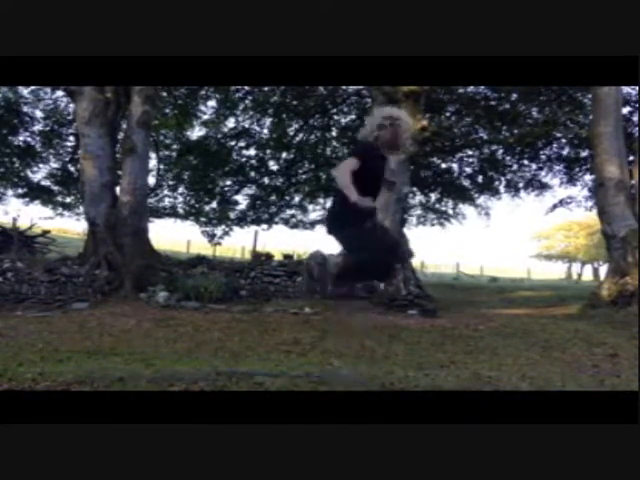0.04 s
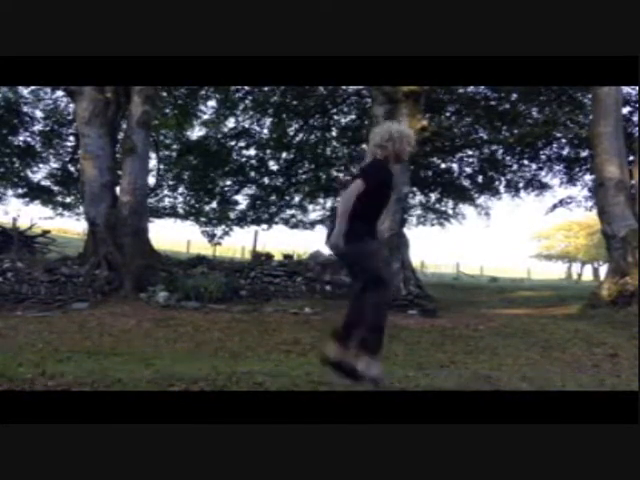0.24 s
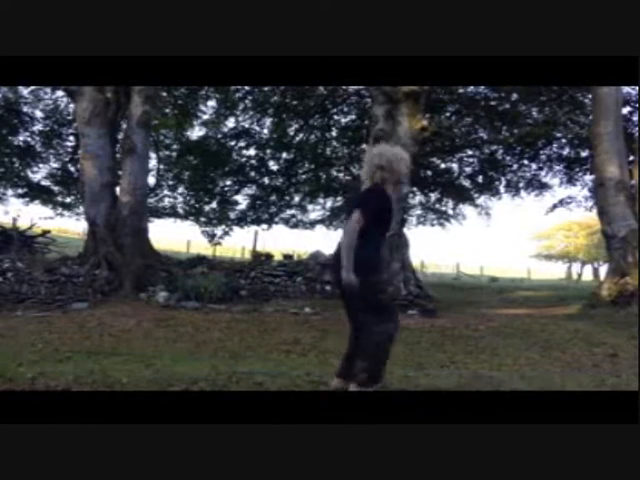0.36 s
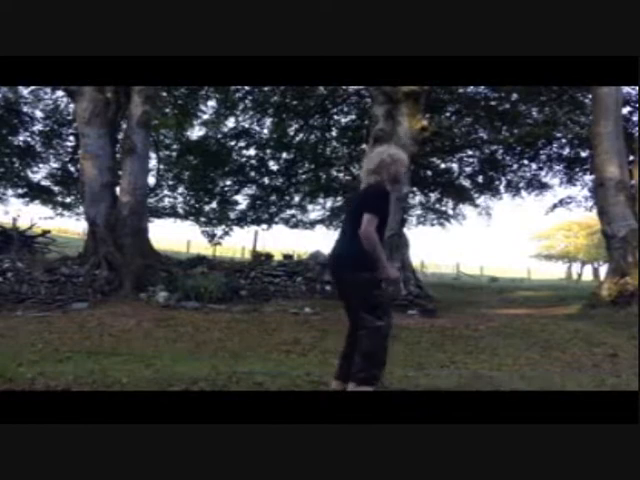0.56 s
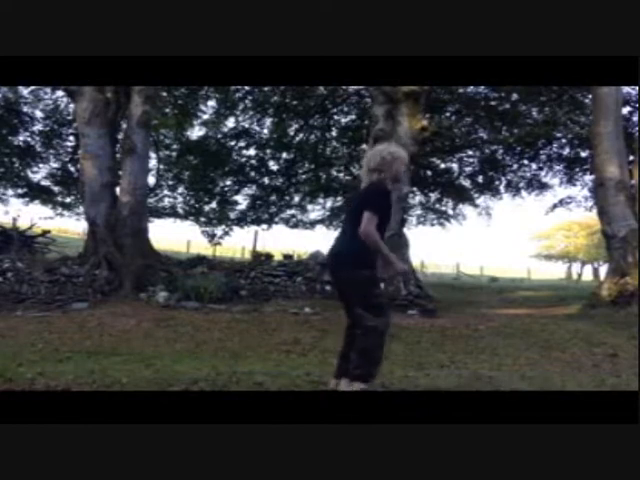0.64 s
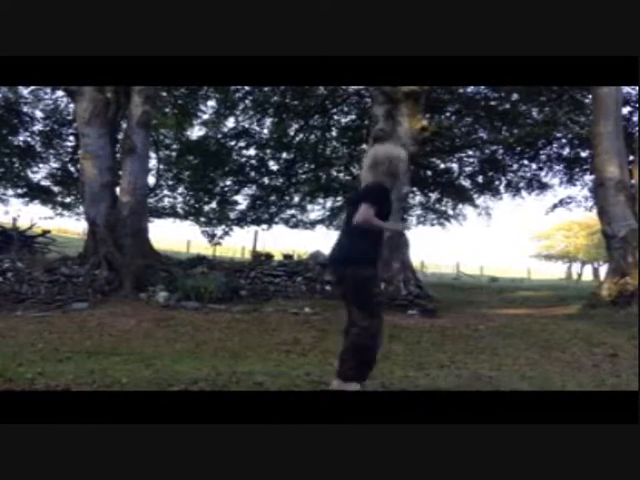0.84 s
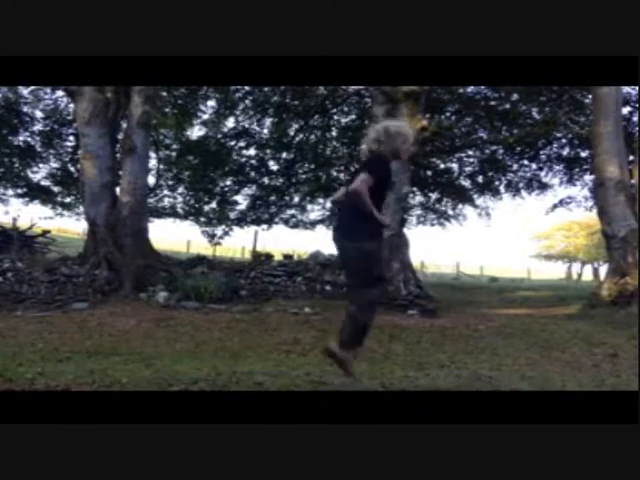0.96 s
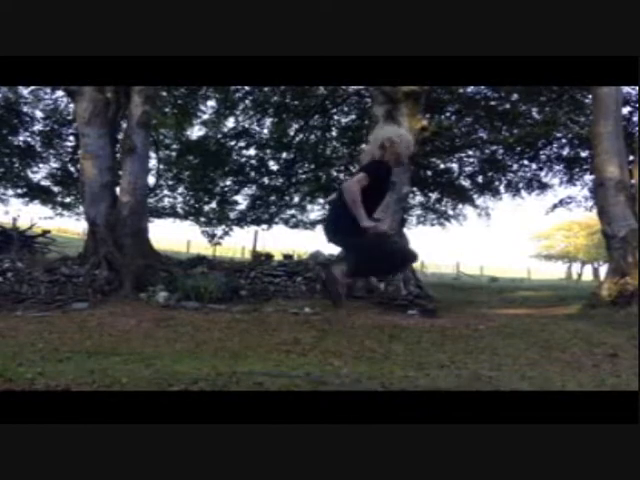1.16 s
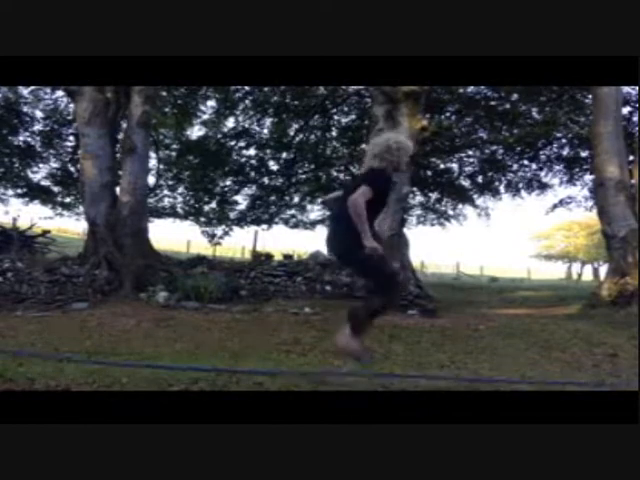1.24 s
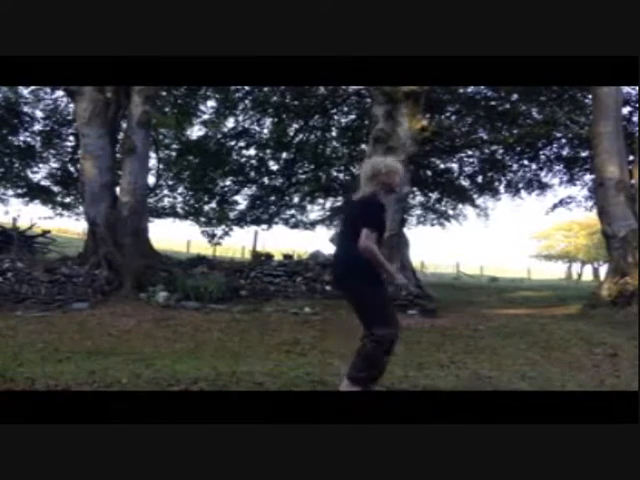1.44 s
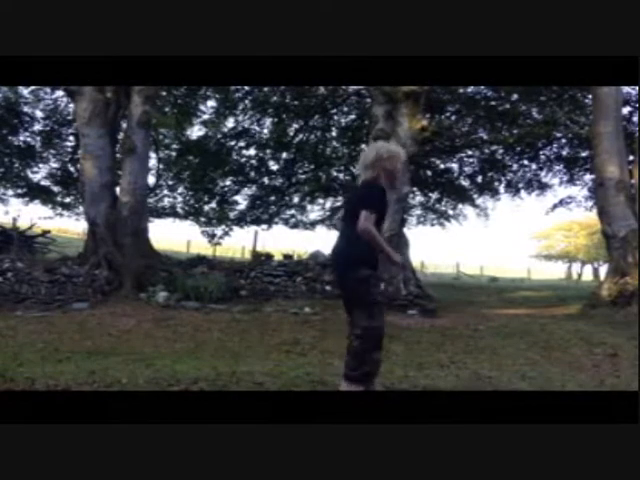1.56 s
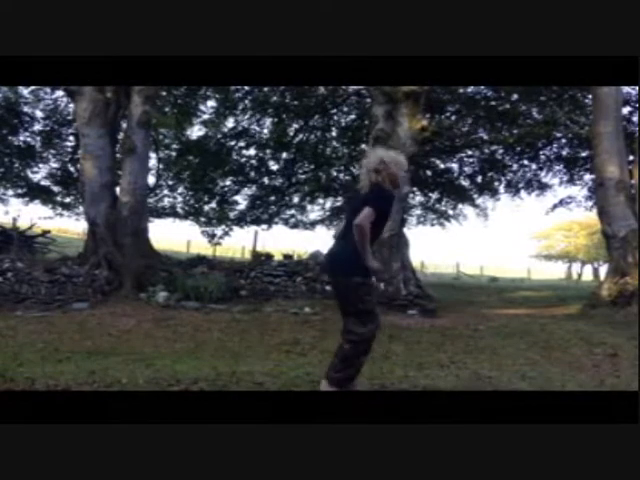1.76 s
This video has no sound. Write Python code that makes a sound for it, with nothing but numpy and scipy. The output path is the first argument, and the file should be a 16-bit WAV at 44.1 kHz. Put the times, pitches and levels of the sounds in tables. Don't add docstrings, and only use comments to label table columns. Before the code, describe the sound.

A skipping rope cracks hard on turf twice, about a second apart, each slap followed by a duller foot landing, with grass rustle and tiny ticks between; close, dry, nearly mono microphone outdoors under trees.

```python
import sys
import numpy as np
from scipy import signal
from scipy.fft import rfft, irfft, next_fast_len
from scipy.io import wavfile
from scipy.ndimage import uniform_filter1d

SR = 44100
rng = np.random.default_rng(int(sys.argv[2]) if len(sys.argv) > 2 else 0)


def gain_from_decibels(decibels):
    exponent = np.asarray(decibels, float) / 20
    return 10 ** exponent


def to_wav(s):
    ch = np.atleast_2d(s).T
    pcm = np.round(np.clip(ch, -1, 1) * 32767)
    wavfile.write(sys.argv[1], SR, pcm.astype(np.int16))


N = 79380
t = np.arange(N) / SR

# (time [s], level [dB],
# ring pitch [Hz], ring t60 [s], thump level [dB])
KNOCKS = [(.054, -24.5, 756, 0.015, -6), (0.0723, -35, 715, 0.02, -1.5), (0.2126, -9.5, 990, 0.025, -3.5),
          (0.2174, -17.5, 713, 0.074, -8.5), (0.2141, -14, 727, 0.043, -20), (0.2166, -16, 910, .015, -12),
          (.2222, -17.5, 800, 0.025, -25), (.228, -24.5, 1164, 0.041, -18), (.246, -27, 890, 0.03, -7),
          (.283, -20, 875, 0.014, -16), (1.3282, -6.5, 907, 0.018, -18.5),
          (1.3328, -18.5, 727, 0.045, -0.5), (1.3355, -18.5, 1166, .03, -16), (1.339, -18, 1026, 0.02, -14),
          (1.353, -32, 790, 0.026, -16), (1.362, -28, 780, 0.021, -20), (1.394, -25.5, 640, 0.021, -27)]
# (landing time [s], level [dB], duration [s], first pitch [Hz], last pitch [Hz])
SWINGS = [
    (0.213, -39, 0.1013, 109.7, 196.3),
    (1.327, -44.5, 0.077, 124.2, 191),
]
# (frequency [Hz], level [dB])
BLADES = [(300, -41), (1500, -13), (3000, 1), (5000, 3.5), (6500, 5), (8500, 5.5), (11000, 4.5), (12000, 0)]


def unit(x):
    return x / np.sqrt(np.mean(x ** 2))


def colour(x, points):
    p = np.array(points, float)
    n = next_fast_len(N)
    f = np.maximum(np.arange(n // 2 + 1) * SR / n, 1)
    gain = gain_from_decibels(np.interp(np.log(f), np.log(p[:, 0]), p[:, 1]))
    return irfft(rfft(x, n) * gain, n)[:N]


def band(x, hz, width):
    return signal.lfilter(*signal.iirpeak(hz, hz / width, fs=SR), x)


def walk(rate):
    hold = int(SR / rate)
    levels = np.repeat(rng.standard_normal(N // hold + 1), hold)
    return 1.225 * uniform_filter1d(uniform_filter1d(levels, hold), hold)[:N]


def decay(s, t60):
    return np.exp(-np.log(1000) * s / t60)


def ring(at, hz, t60, rise=2.85):
    s = np.maximum(t - at, 0)
    return -decay(s, t60) * np.sin(2 * np.pi * hz * s) * (1 - np.exp(-s * hz * rise))


def knocks():
    # (time [s], level [dB], ring pitch [Hz], ring t60 [s], thump level [dB])
    steps = [(0.4722, -16, 960, 0.0072, -12), (.478, -23.5, 1232, 0.021, -7),
             (0.4824, -22, 597, 0.017, -10.5), (.4935, -28, 1090, 0.018, -22),
             (0.501, -30, 526, 0.019, -1.5), (0.806, -43.5, 950, 0.026, -12), (0.8991, -31, 950, 0.02, -24),
             (.9045, -33, 760, 0.011, -28), (.9173, -21.5, 965, .035, -14.5), (.9183, -21, 955, 0.031, -38),
             (.929, -35, 1010, 0.027, -28), (.971, -41, 1053, 0.032, -18), (0.991, -43, 905, .05, -27),
             (1.0855, -35, 930, 0.027, -1.5), (1.184, -40, 1220, 0.026, -14),
             (1.289, -47, 1100, 0.012, -13), (.953, -42, 646, 0.0066, -19), (1.484, -43, 880, 0.023, -27),
             (1.4929, -18, 990, 0.022, -18), (1.4947, -15, 747, 0.014, -4), (1.5012, -18.5, 612, 0.015, -7),
             (1.4937, -19.5, 354, 0.083, -26), (1.509, -23, 970, 0.0067, -14)]
    # (frequency ratio to ring [1], level [dB], t60 ratio to ring [1])
    turf = [(1.229, -8.5, 1.02), (0.767, -8.5, 0.82), (1.71, -17, 0.38), (2.436, -16, 0.63)]
    thump_hz, thump_t60_s = 204, 0.05
    sod_hz, sod_t60_s, sod_db = 369, 0.062, -5
    impacts = [*KNOCKS, *steps]
    chance = rng.standard_normal((len(impacts), 12))
    out = 0
    for (at, db, hz, t60, thump_db), c in zip(impacts, chance):
        thump = ring(at, thump_hz * (1 + 0.039 * c[0]), thump_t60_s)
        sod = gain_from_decibels(sod_db + 1.7 * c[5]) * ring(at, sod_hz * (1 + 0.025 * c[11]), sod_t60_s)
        x = ring(at, hz, t60) + gain_from_decibels(thump_db) * (thump + sod)
        if hz > 500:
            for k, (ratio, mode_db, t60_ratio) in enumerate(turf):
                mode_hz = hz * ratio * (1 + 0.045 * c[k + 6])
                x = x + gain_from_decibels(mode_db + 2.2 * c[k + 1]) * ring(at, mode_hz, t60 * t60_ratio)
        out = out + gain_from_decibels(db) * x
    return out


def cracks():
    # (time [s], level [dB], width [ms])
    pulses = [
        (.0540, -26.5, 0.12),
        (0.2133, -7, 0.067),
        (.2170, -12, 0.27),
        (.4725, -23.5, 0.21),
        (0.9048, -27, 0.16),
        (0.9179, -23, 0.093),
        (1.328, -16.5, 0.049),
        (1.3382, -22, 0.16),
        (1.4935, -13.5, .09),
    ]
    out = 0
    for at, db, width_ms in pulses:
        u = (t - at) * 1000 / width_ms
        out = out - gain_from_decibels(db) * (1 - 0.61 * u ** 2) * np.exp(-u ** 2 / 2)
    return out


def grains(points, rate, grain_db=2.5, bed=0.72):
    patchy_db = 2.5
    struck = rng.random(N) < rate / SR
    uneven = gain_from_decibels(grain_db * np.minimum(rng.exponential(size=N), 4))
    clicks = struck * rng.standard_normal(N) * uneven
    x = unit(colour(unit(clicks) + bed * rng.standard_normal(N), points))
    out = 0
    for hz in 50 * 2 ** np.arange(0, 8., 1):
        out = out + band(x, hz * 1.3, hz) * gain_from_decibels(patchy_db * walk(60.09))
    return unit(out)


def grass():
    # (time [s], level [dB], attack [s], t60 [s], soil share [dB])
    rustles = [(0, -54.5, 0.0087, 0.58, -1), (0.2084, -38, 0.0026, 0.017, 0),
               (0.2116, -20.5, 0.00094, 0.17, -3), (0.219, -26, 0.0026, 0.097, -6),
               (0.23, -28.5, 0.0022, 0.13, -14), (.243, -41, 0.0027, 0.039, -10),
               (.36, -48.5, 0.11, 0.68, -15), (0.262, -38, 0.049, 0.41, -5.5),
               (.430, -44, 0.0023, 0.11, -16), (0.44, -39.5, 0.0021, 0.12, -9),
               (.452, -40, 0.0054, 0.29, 1), (0.4696, -32.5, 0.0031, 0.06, -3.5),
               (0.477, -38.5, .003, 0.04, 4), (.489, -35.5, .004, 0.033, -8), (.498, -47, 0.0092, 0.42, -1),
               (0.487, -53, 0.0051, 0.086, 2), (.52, -46, 0.079, 1.18, -12.5),
               (0.714, -36, 0.0069, 0.056, -20), (.74, -51.5, 0.17, 0.15, -13.5),
               (0.88, -62.5, .006, 0.17, 12), (0.901, -59.5, 0.009, 0.29, 17.5),
               (0.959, -67, 0.034, 0.47, 16.5), (1.057, -51.5, 0.014, 0.12, 0),
               (1.086, -48, 0.005, 0.076, -8), (1.3246, -25.5, 0.0018, 0.044, -10),
               (1.3278, -21.5, 0.0017, 0.097, -12), (1.3372, -27, 0.0013, 0.036, 0),
               (1.347, -31.5, .002, 0.11, -4), (1.356, -34.5, 0.004, 0.12, -6),
               (1.384, -42, 0.026, 0.68, -3.5), (1.4659, -35.5, 0.0018, 0.12, -4),
               (1.474, -38, 0.0088, 0.054, 4), (1.49, -36.5, .003, 0.035, -18),
               (1.493, -46, 0.0035, 0.071, 21), (1.505, -50, .01, 0.37, 1),
               (1.529, -50.5, 0.032, 0.43, 3.5), (1.597, -45, 0.017, 0.37, -22),
               (1.70, -52.5, 0.047, 0.36, -29)]
    # (frequency [Hz], level [dB])
    soil = [(60, -15), (180, -8), (290, -15), (400, -10), (900, -2), (1500, -5), (2500, -15), (6000, -28)]
    blade_power, soil_power = 0, 0
    for at, db, attack, t60, soil_db in rustles:
        rise = np.clip((t - at) / attack, 0, 1) ** 0.44
        env = gain_from_decibels(db) * rise * decay(np.maximum(t - at - attack, 0), t60)
        blade_power = blade_power + env ** 2
        soil_power = soil_power + (env * gain_from_decibels(soil_db)) ** 2
    hiss = np.sqrt(blade_power) * grains(BLADES, 5000)
    crunch = np.sqrt(soil_power) * grains(soil, 1600, grain_db=1.54)
    return hiss + crunch


def ticks():
    # (time [s], level [dB], pitch [Hz])
    snaps = [(0.0537, -29, 9500), (0.0555, -34, 3200), (.072, -46.5, 7940), (.069, -48, 8800),
             (.104, -49, 5950), (0.2135, -13, 4900), (0.216, -24, 3660), (0.4423, -30.5, 4360),
             (0.604, -41, 8000), (.618, -43, 3500), (0.652, -42, 5900), (.721, -39, 4300),
             (0.813, -39, 7600), (0.9036, -36, 3940), (.9172, -36, 3930), (0.917, -39, 8000),
             (0.9617, -38.5, 8800), (0.962, -38.5, 4560), (.979, -46, 7360), (.998, -38, 5100),
             (1.063, -40.5, 4240), (1.086, -37, 4000), (1.2237, -46, 8200), (1.264, -46, 7200),
             (1.314, -50, 9100), (1.3285, -14, 3950), (1.4927, -33, 3030), (1.622, -42.5, 7260),
             (1.7166, -43.5, 4460)]
    t60_s = 0.0055
    noise = unit(colour(rng.standard_normal(N), BLADES))
    out = 0
    for at, db, hz in snaps:
        burst = noise * (t >= at) * decay(np.maximum(t - at, 0), t60_s)
        out = out + gain_from_decibels(db) * (ring(at, hz, t60_s) + 0.55 * burst)
    return out


def hum():
    out = 0
    for end, db, long, first_hz, last_hz in SWINGS:
        u = np.clip(1 - (end - t) / long, 0, 1)
        hz = (first_hz + (last_hz - first_hz) * u) * (1 + 0.035 * walk(44.0))
        phase = 2 * np.pi * np.cumsum(hz) / SR
        swell = gain_from_decibels(db - 12.6 * (1 - u) + 3.5 * walk(46.0)) * np.minimum(u * 6, 1)
        env = swell * np.exp(-np.maximum(t - end, 0) / 0.0044)
        out = out + env * (np.sin(phase) + gain_from_decibels(-19) * np.sin(2 * phase))
    return out


def trunk_echo(hits):
    t60_s, build_up_s = 0.4, 0.039
    s = t[:SR // 2]
    tail = rng.standard_normal(len(s)) * decay(s, t60_s) * np.clip(s / build_up_s, 0, 1) ** 2
    tail = tail / np.sqrt(np.sum(tail ** 2))
    return gain_from_decibels(-18.5) * band(signal.fftconvolve(hits, tail)[:N], 950, 1800)


def buffets():
    # (time [s], level [dB], pitch [Hz], length [s])
    eddies = [(0.083, -50, 123.9, .03), (0.32, -55, 150, 0.032), (.385, -56, 103.5, 0.022),
              (.52, -57.5, 100, 0.021), (0.62, -60, 105, 0.027), (0.683, -64, 80, .035),
              (0.804, -59, 141.5, 0.021), (.845, -60, 128.3, 0.022), (0.984, -57, 111.8, .035),
              (1.068, -52, 137, 0.022), (1.245, -58, 125, .03), (1.667, -55, 141.5, 0.029),
              (1.75, -63.5, 110, 0.033)]
    waver = np.cumsum(1 + 0.082 * walk(29.9)) / SR
    out = 0
    for at, db, hz, long in eddies:
        out = out + gain_from_decibels(db) * np.exp(-((t - at) / long) ** 2) * np.sin(2 * np.pi * hz * waver)
    return out


def air():
    # (frequency [Hz], level [dB])
    leaf_spectrum = [(15, -48), (25, 2), (141, -18), (433, -9), (979, 1.5), (2000, -6.5), (6440, -8),
                     (8100, -6.5), (11000, -12), (14300, -49), (22000, -120)]
    # (time [s], level [dB])
    gusts = np.array([(0, -56.5), (.085, -48), (0.129, -54), (.36, -47), (.44, -50), (.6, -63.5),
                      (.75, -78), (.82, -60.5), (.97, -60), (1.03, -63), (1.07, -51.5), (1.18, -65.5),
                      (1.3, -51), (1.43, -62), (1.57, -54), (1.635, -57), (1.674, -59), (1.75, -70)])
    wind_hz, width_hz = 146, 87
    gust = band(band(rng.standard_normal(N), wind_hz, width_hz), wind_hz, 3.8 * width_hz)
    rumble = band(rng.standard_normal(N), 82, 69)
    leaves = gain_from_decibels(-54.5 - 5.0 + 0.98 * walk(5.4)) * grains(leaf_spectrum, 3000, grain_db=1.5, bed=2.8)
    wind = unit(gust) * gain_from_decibels(2.1 * walk(17.92)) + unit(rumble) * gain_from_decibels(-12.0 + 2.8 * walk(12.5))
    strength = gain_from_decibels(np.interp(t, gusts[:, 0], gusts[:, 1]) - 3.0)
    return leaves + buffets() + wind * strength


def stereo_difference(hits, mid):
    # (centre [Hz], width [Hz], level [dB], switch-on threshold [1])
    side_bands = [(2380, 450, -12, 0.1), (3850, 710, -14, 1.02), (4600, 700, -15, 0.67),
                  (7600, 1100, -15, -0.7), (9400, 800, -17, -.1)]
    slap_s = 0.025
    slaps = [np.exp(-((t - row[0] - slap_s) / slap_s) ** 4) for row in SWINGS]
    low_mids = band(band(hits, 950, 900), 950, 900)
    side = gain_from_decibels(-14) * slaps[0] * np.roll(low_mids, 20)
    for hz, width, db, threshold in side_bands:
        edge = signal.butter(4, [hz - width / 2, hz + width / 2], "band", fs=SR, output="sos")
        on = uniform_filter1d(1. * (walk(14) > threshold), 400)
        side = side + gain_from_decibels(db) * on * (1 - sum(slaps)) * np.roll(signal.sosfilt(edge, mid), 30)
    return side


def scene():
    hits = knocks()
    near = hits + cracks() + ticks() + grass() + hum() + trunk_echo(hits)
    low_cut = signal.butter(3, 141, "high", fs=SR, output="sos")
    mid = signal.sosfilt(low_cut, near) + air()
    side = stereo_difference(hits, mid)
    return np.array([mid + side, mid - side])


def roll_off(x):
    return signal.sosfilt(signal.butter(12, 12140, fs=SR, output="sos"), x)


def record(dry):
    hush_s, lead_s, hush_db = 0.0041, 0.0072, -32
    treble = signal.sosfiltfilt(signal.butter(3, 1800, "high", fs=SR, output="sos"), dry)
    hush = sum(np.exp(-((t - row[0] + lead_s) / (hush_s / 2)) ** 4) for row in [*SWINGS, KNOCKS[0]])
    x = dry - treble * hush * (1 - gain_from_decibels(hush_db))
    top_cut = signal.ellip(12, .3, 53, 11060, fs=SR, output="sos")
    mix = signal.sosfilt(top_cut, x)
    return roll_off(mix)


dry = scene()
out = record(dry)
to_wav(out)
```